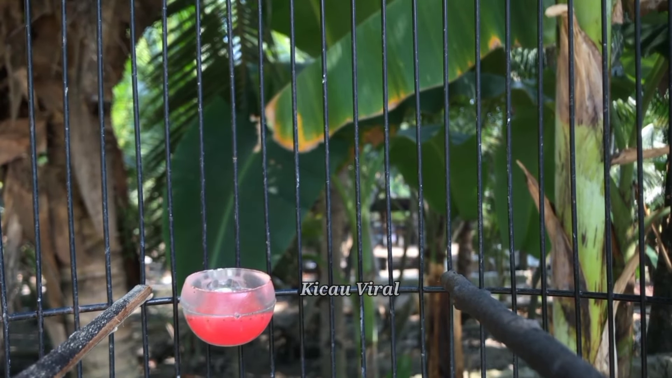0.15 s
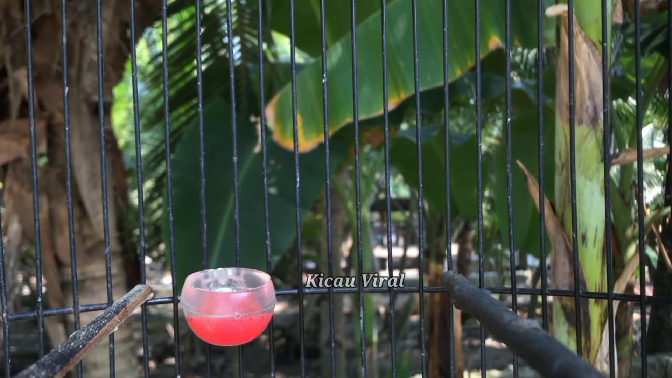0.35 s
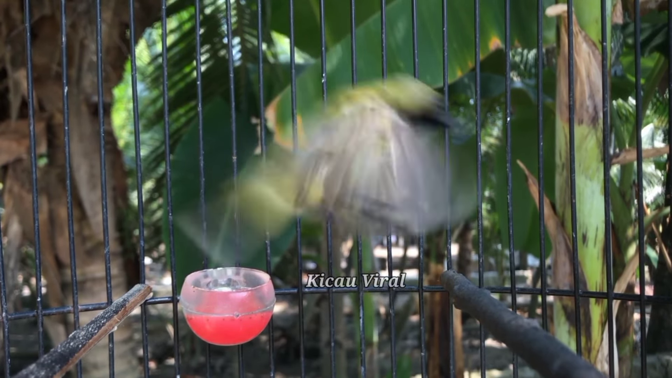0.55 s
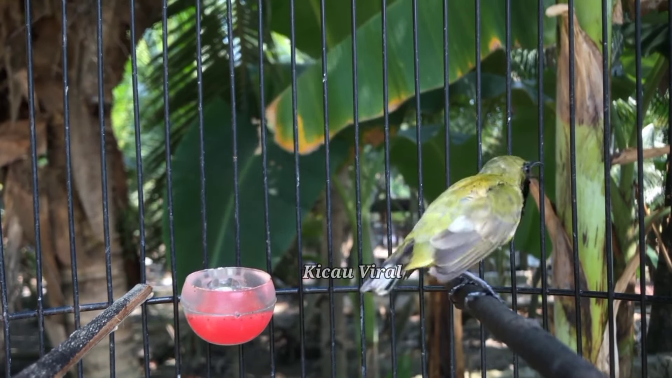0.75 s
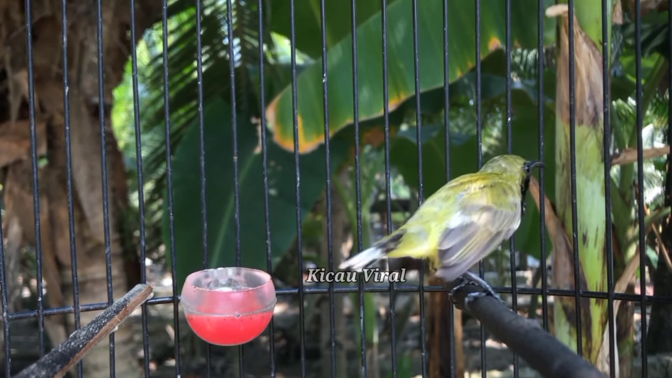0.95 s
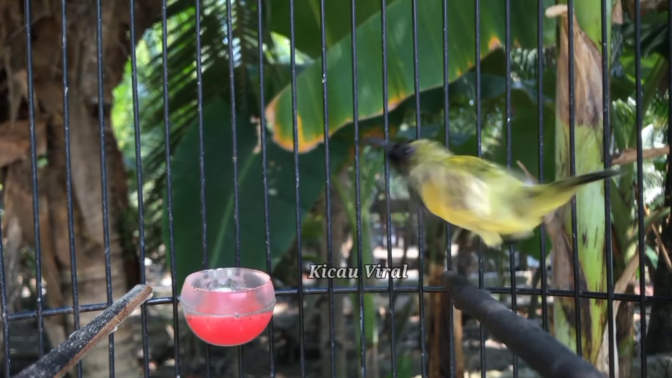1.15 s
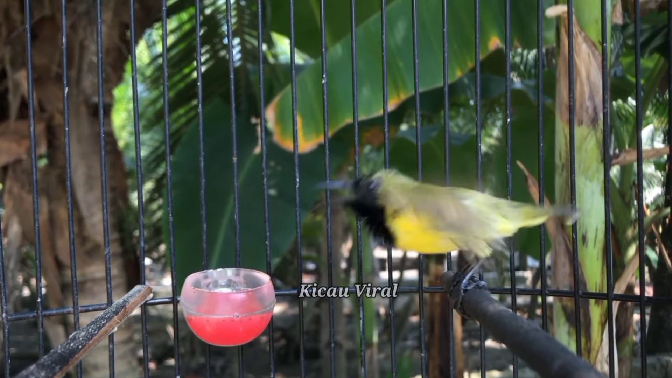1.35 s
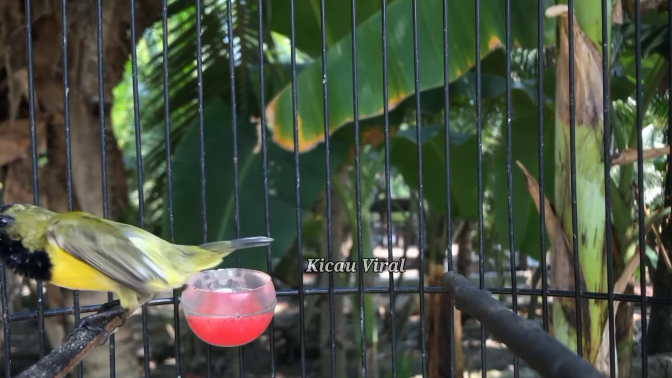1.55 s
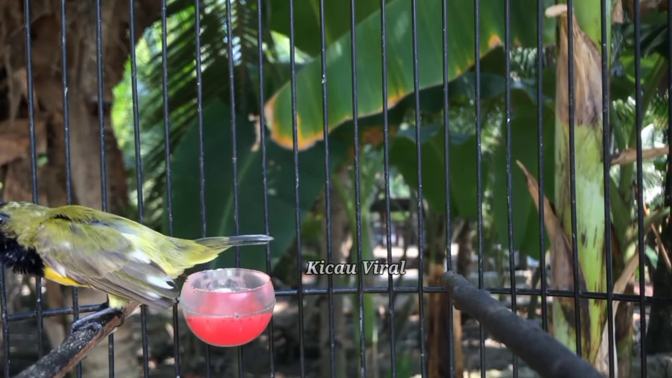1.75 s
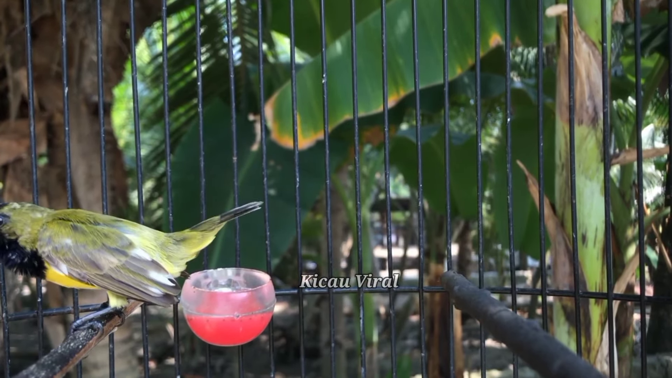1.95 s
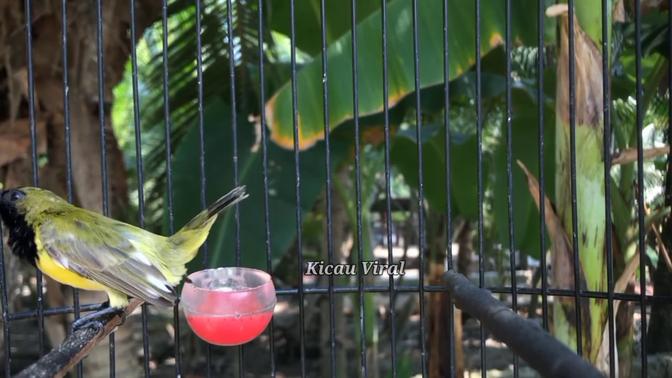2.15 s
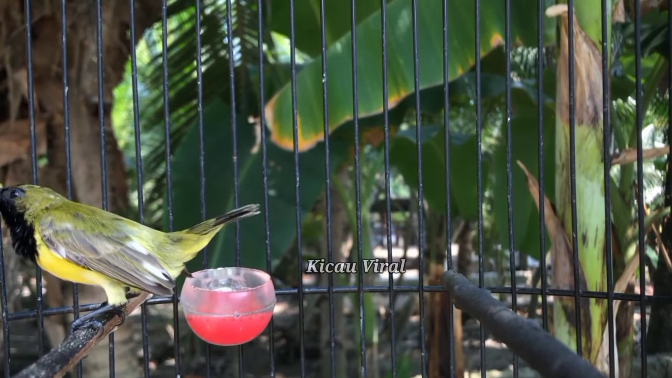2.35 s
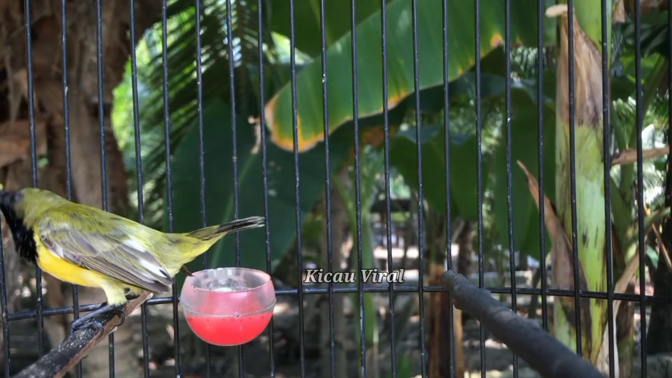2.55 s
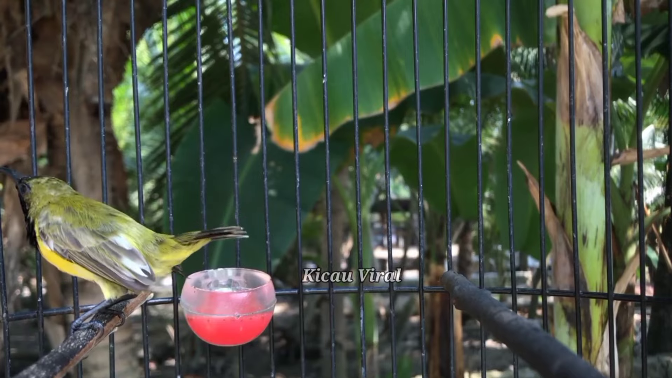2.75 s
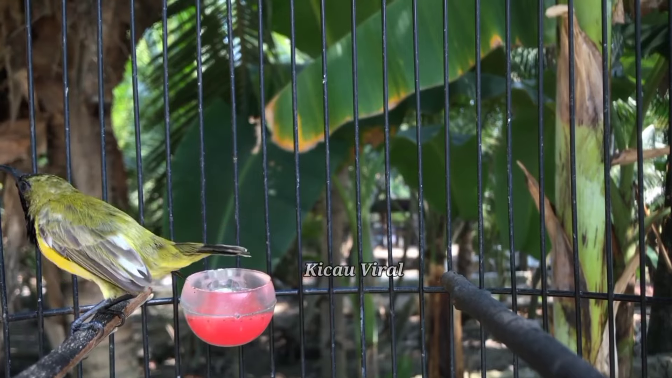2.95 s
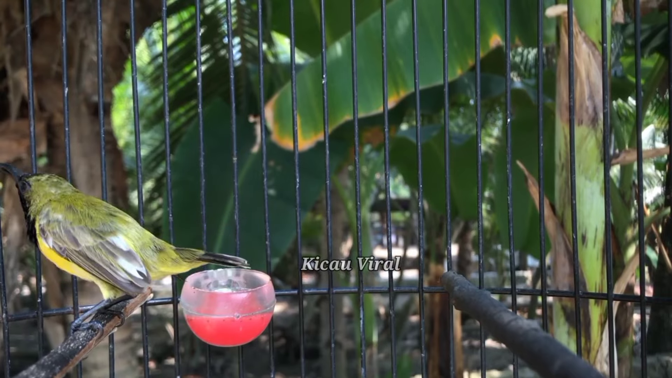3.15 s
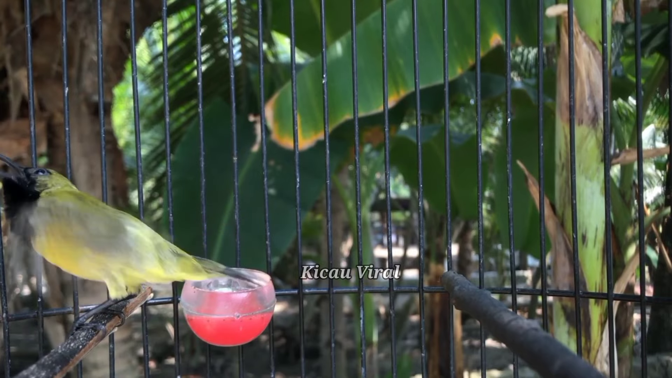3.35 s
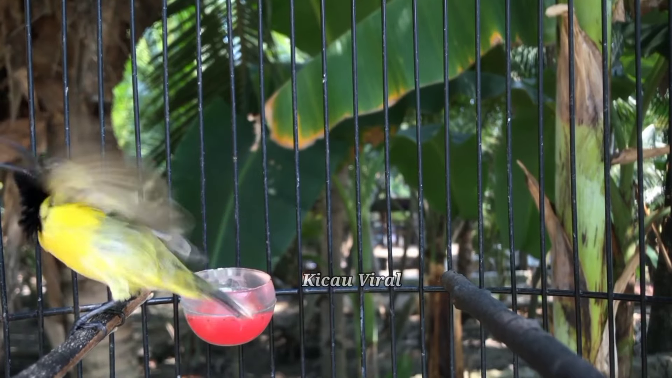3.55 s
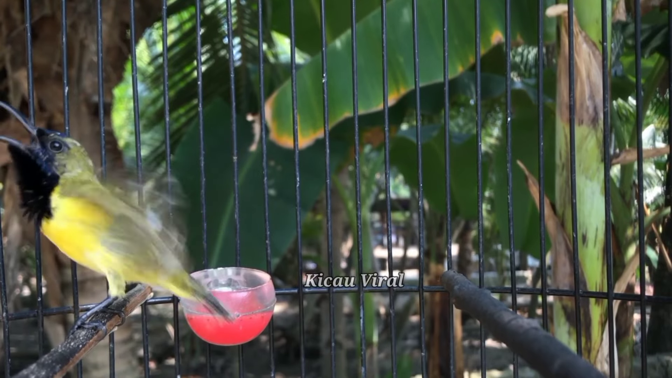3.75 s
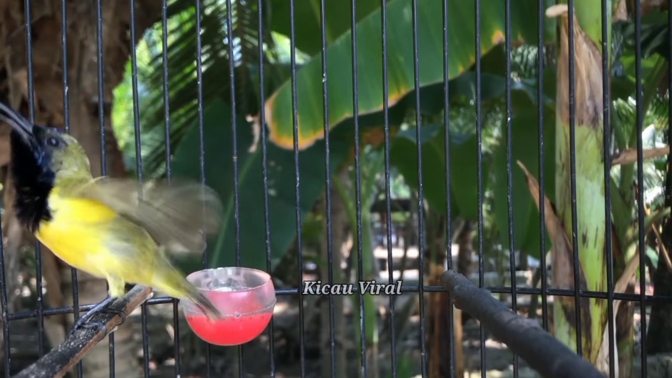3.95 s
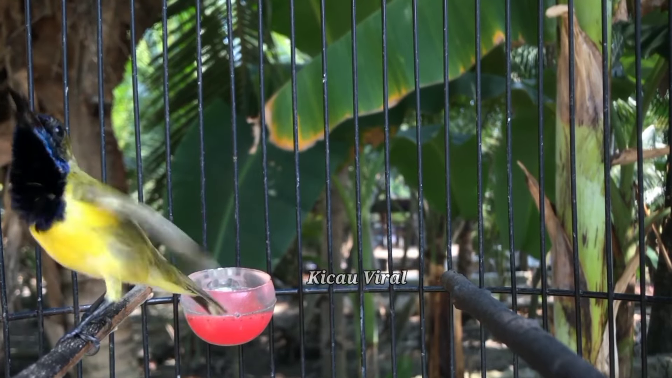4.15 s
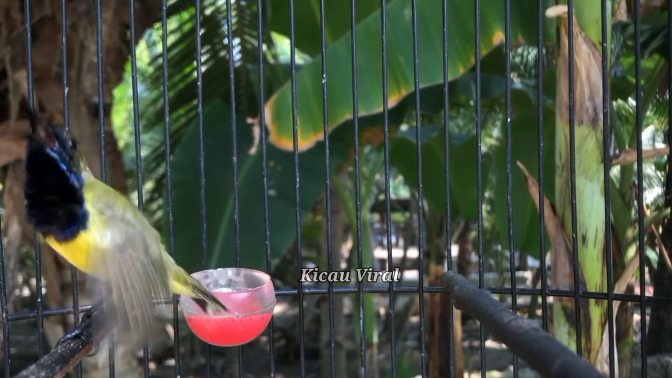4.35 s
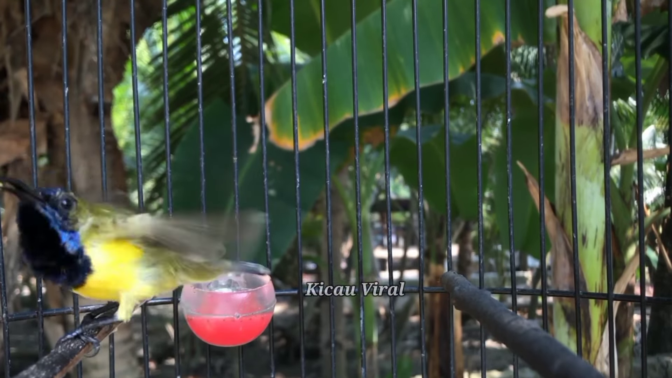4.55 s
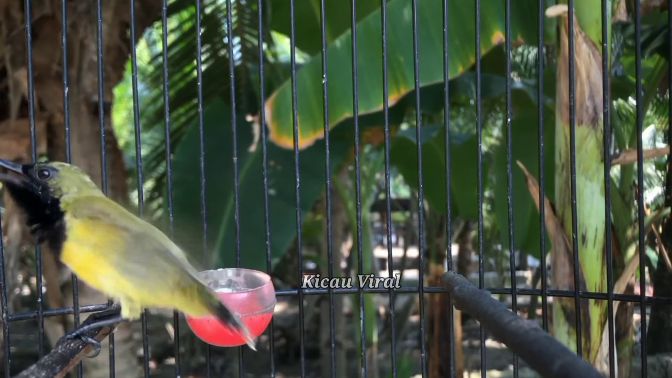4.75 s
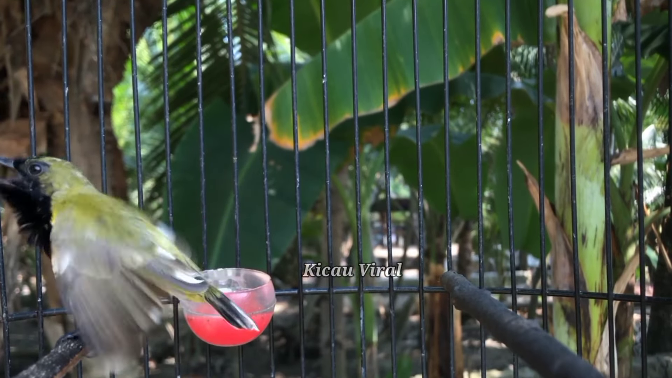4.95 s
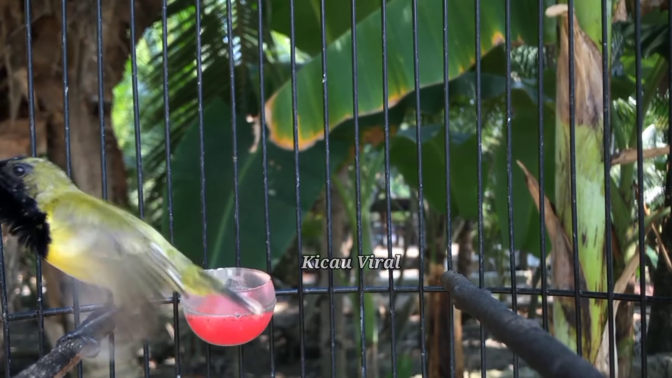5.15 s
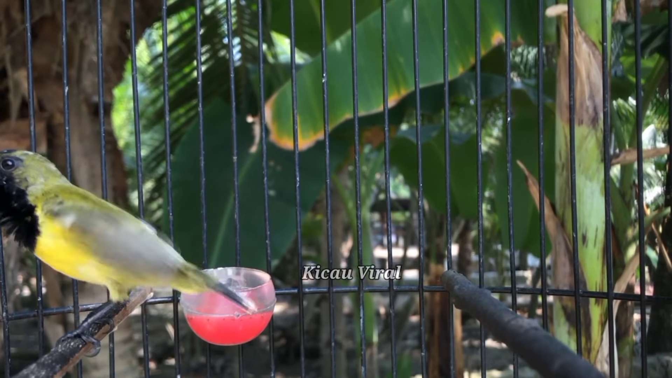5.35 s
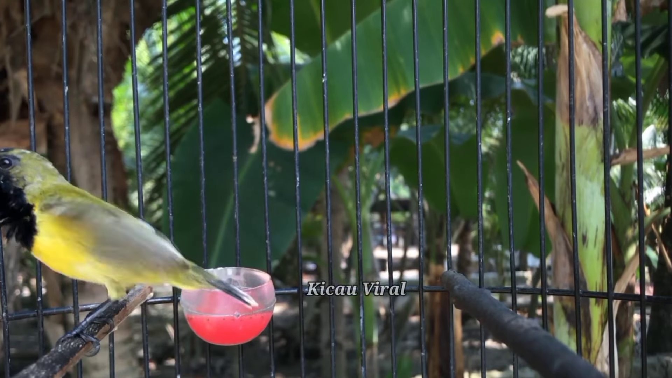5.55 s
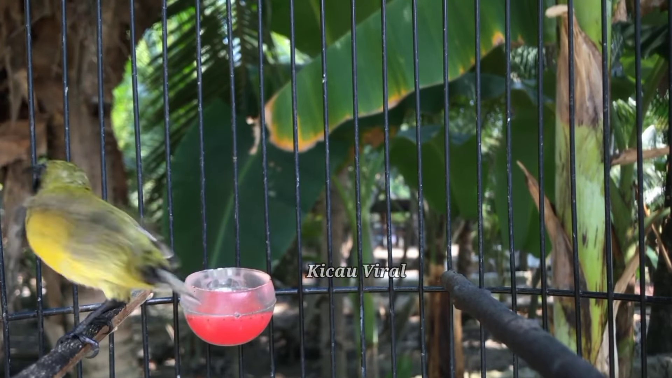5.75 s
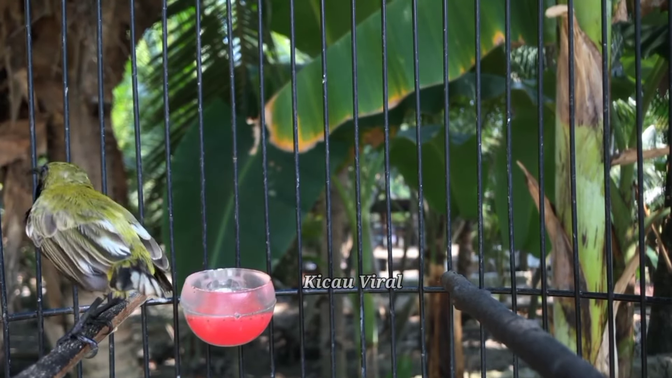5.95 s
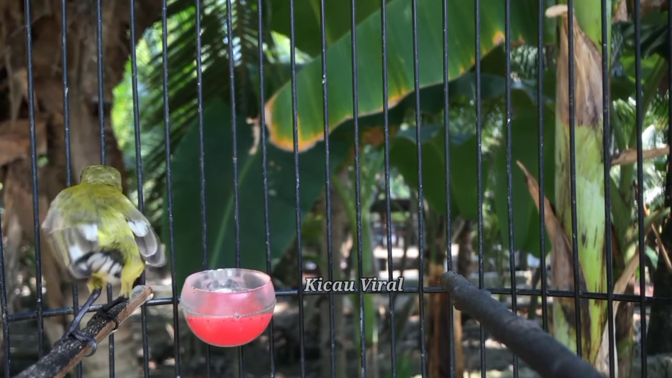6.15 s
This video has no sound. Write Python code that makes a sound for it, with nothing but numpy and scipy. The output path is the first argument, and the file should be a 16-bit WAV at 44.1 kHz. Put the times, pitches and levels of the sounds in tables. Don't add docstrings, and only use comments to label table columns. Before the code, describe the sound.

Outdoors, soft hiss and distant engine rumble lie under scratchy hops, small thuds and ringing cage wire. A close bird gives one piercing chirp, then another, with distant whistles echoing off foliage. After a lull with light rustling and faint taps, it shakes out a high warble, adds two chirps, and launches a rapid string of bright swooping notes, harsh at the loudest crests. The trill stops and far birds whistle at the end.

```python
import sys
import numpy as np
from scipy import signal
from scipy.io import wavfile
from scipy.ndimage import uniform_filter1d

SR = 44100
rng = np.random.default_rng(int(sys.argv[2]) if len(sys.argv) > 2 else 0)


def undo_db(level):
    steps = np.asarray(level, float) / 20
    return 10 ** steps


def bounce(signal):
    frames = np.transpose(np.atleast_2d(signal))
    limited = np.clip(frames, -1, 1)
    pcm = np.round(limited * 32767).astype(np.int16)
    wavfile.write(sys.argv[1], SR, pcm)


N = 273861
LEAD_IN = 4410

# (frequency [Hz], level per Hz [dB])
AIR_SPECTRUM = [(120, -23.5), (200, -1.5), (429, -8), (783, -10), (1170, -10), (2020, -17), (3180, -15.5),
                (4020, -19), (6570, -21), (7890, -24), (10400, -27), (11300, -25), (15500, -17.5)]
# (frequency [Hz], level per Hz [dB])
RUMBLE_SPECTRUM = [(12, -60), (20, -42.5), (45, -8), (64, 4), (81, 0.5), (102, -11), (141, -7.5),
                   (182, -17), (260, -32), (340, -41.5), (570, -120)]
# (time [s], drone level [dB])
ENGINE_LEVELS = [(0.0, -51.5), (1.6, -51.5), (2.5, -59.5), (3.5, -64.5), (4.1, -67.5), (5.2, -67),
                 (5.5, -50), (5.9, -62.5), (6.21, -47)]
# (frequency [Hz], width [Hz], level [dB])
ENGINE_HUMPS = [(303, 100, -0.5), (433, 18, 13), (593, 60, 1.5), (690, 54, -1.5), (1070, 46, -6)]
# (time [s], length [s], rumble
# change [dB], drone change [dB])
LOW_SWELLS = [(0.712, 0.053, 14, 9.5), (4.204, 0.1, 4, 13.5), (4.527, 0.09, -3.5, -30),
              (4.928, 0.048, 8, 1.5), (6.135, 0.067, 9, 1)]

OVERTONES_DB = [3.5, 7.5, 3, -1, -5, 0.5, -2, -10]
THROAT_OPEN_HZ = 6800
# (frequency [Hz], width [Hz], depth [dB])
PERCH_NOTCHES = [(4300, 198, -14), (4900, 210, -2.5), (8020, 780, -1)]
# (pitch [Hz], width [Hz], depth [dB])
VOICE_BREAKS = [(4625, 900, -6), (2720, 250, -7)]
# (time [s], centre pitch [Hz], level [dB], vibrato depth [Hz])
WARBLE = [(3.354, 2063, -28, 299), (3.368, 2733, -14, 297.5), (3.3725, 5730, -18.5, 5),
          (3.377, 3638, -13.5, 0), (3.381, 5800, -4, 905), (3.4, 6800, -3, 621), (3.417, 7300, -3, 448.5),
          (3.425, 7280, -8.5, -3), (3.433, 7220, -53, -1)]

# (time [s], pitch [Hz], effort [dB])
CHIRPS = [
    [(0.854, 3660, -28), (0.863, 3546, -19), (0.8748, 3680, -9), (0.878, 4516, -10), (0.881, 4354, -13),
     (0.8843, 6400, -4.5), (0.887, 6970, -22.5), (0.889, 6110, -10.5), (0.895, 6530, -10)],
    [(1.471, 3573, -23.5), (1.479, 3792, -14), (1.486, 3600, -5), (1.4893, 3740, -5), (1.492, 4530, -13.5),
     (1.4965, 6150, -9), (1.503, 7064, -7), (1.508, 6707, -8), (1.512, 6630, -9.5)],
    [(3.508, 1656, -31.5), (3.52, 2326, -16), (3.53, 3002, -8), (3.538, 2880, -10.5), (3.57, 3680, -7),
     (3.574, 4277, -13), (3.579, 6910, -7.5), (3.584, 7200, -3.5), (3.59, 6350, -6)],
    [(3.657, 1582, -28), (3.668, 2270, -14), (3.692, 3180, -5), (3.709, 3400, -9), (3.723, 3565, -6),
     (3.727, 5073, -21.5), (3.732, 6090, -4.5), (3.737, 7280, -6), (3.745, 6650, -5.5)],
]
# (time after its last point [s], pitch [Hz], level against that point [dB])
CHIRP_FALL = [(.004, 5480, 2), (.008, 3997, -9), (0.013, 2900, -2), (0.018, 2080, -17), (.025, 1863, -14.5)]
# (time stretch [ratio], last pitch [Hz], throat at the end [Hz], level [dB])
FALL_ENDS = [(1.03, 1720, 5200, -5), (.95, 1810, 4700, -7), (.84, 2140, 6500, -4), (.94, 1860, 5300, -4)]
CHIRP_FIRST_DB = [8.9, 2.9, 0.38, 0.156]
FALL_FIRST_DB = [3, 8, 1.5, 1.5]
CATCH_S = [.003, .004, 0.015, .012]

# (time [s], pitch [Hz], level [dB])
LEAD_NOTE = [(3.804, 1673, -31), (3.812, 2110, -17.5), (3.822, 2457, -11.5), (3.829, 2696, -19),
             (3.836, 3110, -3.5), (3.844, 2773, -6.5), (3.852, 2585, -9.5), (3.862, 2542, -13.5),
             (3.87, 2037, -47.5)]
# (crest time [s], crest [Hz], shoulder [Hz], crest level [dB], shoulder level [dB])
TRILL = [(3.9207, 3200, 2654, 0, -5.5), (4.0028, 3194, 2698, -4, -3.5), (4.086, 3080, 2770, -2.5, -7.5),
         (4.1689, 3177, 2722, -0.5, -6.5), (4.2542, 3186, 2546, -2.5, -7.5),
         (4.34, 3230, 2587, -1.6, -11.5), (4.424, 3143, 2573, -5, -8), (4.506, 3288, 2797, -5.5, -7.5),
         (4.5899, 3172, 2410, -6.5, -21), (4.6771, 3076, 2417, -5.5, -19), (4.7666, 3075, 2500, -5, -13.5),
         (4.8529, 3148, 2507, -2.5, -12.5), (4.9386, 3035, 2346, -7.5, -14.5),
         (5.0265, 3230, 2580, -6, -13), (5.113, 3218, 2473, -4.5, -11.5), (5.1982, 3170, 2493, -5.5, -9.5),
         (5.2843, 3212, 2360, -3.5, -13.5), (5.3733, 3015, 2370, -5.5, -17.5),
         (5.4646, 3052, 2320, -4.5, -20.5), (5.567, 2937, 2266, -7, -16), (5.6546, 3174, 2358, -3.5, -14.5),
         (5.745, 3080, 2366, -6, -10), (5.8493, 2947, 2053, -5.5, -14.5)]
# (foot [Hz], rise [Hz], shoulder after the crest [ms], ledge [Hz], ledge end [Hz])
TURNS = [(2130, 2420, 8.5, 2649, 2400), (2150, 2400, 9.5, 2627, 2444), (2090, 2320, 9.5, 2627, 2350),
         (2250, 2480, 12, 2562, 2433), (1990, 2333, 9.5, 2562, 2315), (2010, 2397, 11.5, 2530, 2358),
         (2074, 2405, 10, 2562, 2315), (2103, 2419, 12, 2702, 2519), (2146, 2405, 12, 2476, 2379),
         (2038, 2369, 9.5, 2422, 2293), (2010, 2333, 9.5, 2541, 2326), (1945, 2283, 10.5, 2573, 2358),
         (2074, 2333, 9.5, 2444, 2336), (2110, 2397, 10, 2573, 2390), (2103, 2541, 10, 2552, 2347),
         (1845, 2304, 12, 2476, 2315), (2103, 2326, 10.5, 2422, 2315), (1859, 2268, 8.5, 2358, 2270),
         (1838, 2318, 10.5, 2304, 2200), (1650, 2153, 10, 2272, 2050), (1787, 2326, 10, 2401, 2315),
         (1967, 2340, 10, 2401, 2250), (1773, 2361, 9, 2095, 2085)]
# (start [dB], foot [dB], rise [dB], gap before the crest [dB], ledge [dB])
EFFORTS = [(-21, -15, -16, -18, -14.5), (-19, -15.5, -11, -17, -16.5), (-19.5, -21, -8.5, -16, -12.5),
           (-18.5, -15.5, -11, -15.5, -10), (-26.5, -14, -9.5, -15.5, -11.5),
           (-23.5, -16, -9.5, -15, -12.5), (-26, -13, -8.5, -16.5, -15.5), (-23, -10, -11.0, -14.5, -9),
           (-21.5, -14.5, -11.5, -9, -16), (-21, -18, -11, -14.5, -12.5), (-19.5, -16.5, -9, -13, -13),
           (-29, -15.5, -8.5, -12.0, -13.5), (-24, -11, -12.5, -17.5, -12), (-19.5, -15, -12.5, -17, -13),
           (-25, -18.5, -13, -12.5, -11), (-44, -20, -9.5, -17.5, -9), (-23, -15.5, -10, -15.5, -9),
           (-26.5, -17.5, -9, -17, -13), (-24, -20.5, -10, -18.5, -15.5), (-30, -14.5, -12.5, -14, -16),
           (-18.5, -16.5, -14.5, -19, -6.5), (-14.5, -16.5, -11.5, -19, -15),
           (-28, -16.5, -12, -18.5, -17.5)]
# (knee [Hz], knee level [dB], ledge start [dB], tail [Hz], tail level [dB])
SLIDES = [(2740, -3, -6, 2100, -19), (2860, -6.5, -8, 2347, -13.5), (2820, -9.5, -10.5, 2347, -23),
          (2934, -3, -8.5, 2336, -14), (2980, -2.5, -10.5, 2239, -14.5), (3020, -2, -10, 2325, -14.5),
          (2740, -7, -8, 2250, -14.5), (3036, -4.5, -11.5, 2379, -11.5), (2980, -7.5, -17, 2282, -15.5),
          (2660, -12, -18.5, 2174, -14), (2770, -10, -8, 2239, -12), (2800, -12.5, -11.5, 2271, -12.5),
          (2691, -9.5, -11, 2282, -18.5), (2908, -7, -11.5, 2350, -16), (2831, -7.5, -12, 2293, -17),
          (2982, -8.5, -12.5, 2271, -23), (2870, -6.5, -12.5, 2271, -22.5), (2350, -17, -11, 2131, -26),
          (2573, -6.5, -8.5, 2300, -16.5), (2366, -11.5, -12, 2034, -12.5), (2720, -5, -12.5, 2271, -22),
          (2765, -5.5, -12.5, 2200, -13.5), (2331, -14.5, -21, 2040, -14)]
# (time before the crest [ms], time after it [ms])
SPANS = [(23, 24), (23, 28), (20.84, 30), (23.17, 28), (24, 34), (24, 31), (24, 27), (24.9, 27), (21, 39),
         (24, 25), (24, 25), (23, 28), (24, 32.8), (21.77, 28), (23, 41), (24, 28), (23, 41), (24, 62),
         (23.1, 28), (24, 25), (21, 45), (18.8, 27), (22.7, 20)]
TRILL_FIRST_DB = [-4, 1.5, 1.5, -9.5, -1.5, -1, -0.5, 8, 0.5, -7, 1.5, 3, 10, 1.5, 4, 4, 4, 6, 5, 7, 7.5, 7,
                  6]
# (delay [s], level [dB])
NEAR_ECHOES = [(.0011, -25), (.0023, -21), (.0041, -31.5), (.0072, -22)]

# (time [s], length [s], level [dB])
RUSTLES = [
    (0.257, 0.27, -58),
    (0.494, 0.25, -61.5),
    (2.333, 0.256, -61),
    (3.045, 0.15, -73),
]
# (time [s], peak [dB], thud against it [dB], ring-out t60 [s])
HOPS = [(0.2705, -32, -29, 0.17), (0.2834, -37.5, -23, 0.093), (0.332, -36.5, -29, 0.051),
        (0.661, -25.5, -10, 0.057), (0.6896, -21.5, -8, 0.039), (0.718, -25.5, -12, 0.11),
        (0.7304, -25, -0.5, 0.04), (0.7492, -42, 5.5, 0.062), (1.2717, -39.5, -6, 0.058),
        (1.2908, -31.5, -5, 0.048), (1.3162, -29.5, -5, 0.02), (1.3318, -39.5, -19.5, 0.06),
        (1.6248, -22, -4, 0.058)]
# (frequency [Hz], level [dB], t60 [s])
CAGE_RING = [(480, -2, .3), (600, -1, 0.23), (684.4, 0, 0.27), (1140, -8, 0.17), (1490, -3.5, 0.076)]
# (time [s], peak [dB], frequency [Hz])
KNOCKS = [
    (2.572, -44, 640),
    (2.625, -48, 980),
]

# (time [s], length [s], from [Hz], to [Hz], level [dB])
FAR_GLIDES = [(1.132, 0.045, 3485, 3060, -45), (1.166, 0.028, 3010, 2538, -44),
              (1.269, .05, 3900, 3470, -66), (1.271, .1, 1056, 1044, -59.5),
              (1.428, 0.077, 2900, 2230, -50.5), (0.589, 0.029, 6800, 6580, -59.5),
              (1.204, 0.051, 2580, 3010, -55), (1.308, 0.055, 2943, 2300, -46),
              (1.538, .12, 2520, 2146, -59), (1.646, 0.13, 2323, 1693, -57), (1.755, 0.08, 4300, 4390, -61),
              (1.539, 0.26, 1076, 1149, -59.5), (1.86, .07, 1091, 1147, -68),
              (2.026, .04, 7270, 5640, -53.5), (2.639, 0.12, 1220, 1317, -66.5),
              (2.737, 0.045, 3380, 3390, -57), (2.78, 0.035, 3760, 3920, -59),
              (2.845, 0.027, 5310, 6520, -51.5), (2.805, 0.11, 5110, 6050, -58),
              (2.834, 0.067, 4010, 4400, -63), (3.049, 0.0507, 6440, 5600, -62.5),
              (3.053, 0.0497, 5000, 4280, -71.5), (1.287, 0.096, 3150, 3070, -57),
              (2.912, 0.14, 2270, 3170, -65.5), (2.978, 0.0167, 2790, 2890, -56.5),
              (5.62, 0.27, 3790, 3732, -46), (5.877, 0.07, 2940, 3272, -40.5),
              (6.128, 0.04, 2656, 2942, -41.5), (6.14, .05, 6900, 5920, -61.5),
              (6.085, 0.026, 4000, 4600, -55), (6.15, 0.057, 2660, 2600, -58), (5.481, 0.28, 342, 345, -70),
              (5.958, 0.06, 345.4, 342, -53)]
# (time [s], length [s], from [Hz], to [Hz], level [dB])
FAR_HOOKS = [(1.296, 0.4, 7190, 6250, -60), (1.938, 0.16, 8920, 6536, -61), (2.26, 0.066, 5170, 5914, -59),
             (2.54, 0.1, 8140, 6530, -55.5), (3.129, .13, 8500, 6570, -57.5),
             (6.081, 0.07, 2857, 2725, -44), (5.901, 0.1, 3200, 3550, -41.5),
             (6.158, 0.086, 2964, 3700, -36)]


def evened(x):
    return x / np.sqrt(np.mean(x ** 2) + 1e-20)


def coloured(points, patchy_db, size=1024):
    hz = np.fft.rfftfreq(size, 1 / SR)
    f, db = np.transpose(points)
    a, b, patches = rng.standard_normal((N * 4 // size + 5, len(hz), 3)).T
    patches = uniform_filter1d(patches, size=10, axis=0)
    patches = evened(uniform_filter1d(patches, size=14, axis=1))
    shape_db = np.interp(np.log(hz + 1), np.log(f + 1), db, left=-100, right=-100)
    z = (a + 1j * b) * undo_db(shape_db[:, None] + patchy_db * patches)
    return evened(signal.istft(z, nperseg=size, noverlap=size * 3 // 4)[1][:N])


def band(x, lo_hz, hi_hz):
    return signal.sosfilt(signal.butter(2, [lo_hz, hi_hz], "bandpass", fs=SR, output="sos"), x)


def add(mix, s, sound):
    part = mix[round(s * SR) + LEAD_IN:][:len(sound)]
    part += sound[:len(part)]


def garden(x, t60, fast_t60, fast_db):
    t = np.arange(SR) / SR
    taps = rng.choice([-1., 1.], SR) * (rng.random(SR) < .1) * (t > .004)
    tail = taps * (undo_db(-60 * t / t60) + undo_db(fast_db - 60 * t / fast_t60))
    tail = signal.lfilter([1], [1, -.5], tail)
    return signal.fftconvolve(x, tail / np.linalg.norm(tail))[:len(x)]


def curves(rows, smooth_s):
    s, *columns = np.transpose(rows)
    t = np.arange(s[0], s[-1], 1 / SR)
    size = int(smooth_s * SR)
    return t, [uniform_filter1d(np.interp(t, s, c), size, mode="nearest") for c in columns]


def background():
    t, hz = np.arange(N) / SR, np.geomspace(200, 1600, 200)
    drone_db = np.interp(t, *np.transpose(ENGINE_LEVELS))
    rumble_db = -52.5 + 0.3 * (drone_db - drone_db.mean())
    for s, length, low_db, high_db in LOW_SWELLS:
        puff = np.exp(-((t - s) / length) ** 2)
        rumble_db = rumble_db + low_db * puff
        drone_db = drone_db + high_db * puff
    humps = sum(undo_db(2 * db) / (1 + (2 * (hz - f) / w) ** 2) for f, w, db in ENGINE_HUMPS)
    drone = coloured(np.transpose([hz, 10 * np.log10(humps)]), patchy_db=1.5, size=2048)
    insect = coloured([(11250, -25), (11400, 0), (11550, -25)], patchy_db=0.0)
    hiss = coloured(AIR_SPECTRUM, patchy_db=1.0)
    rumble = coloured(RUMBLE_SPECTRUM, patchy_db=2.5, size=4096)
    return undo_db(-59.5) * hiss + undo_db(drone_db - 5.5) * drone + undo_db(rumble_db) * rumble + undo_db(-77) * insect


def syrinx(hz, db, throat_hz, first_db, breath_db, side_db=-60, ragged=0):
    k = np.arange(1, len(OVERTONES_DB) + 1)[:, None]
    rough = uniform_filter1d(rng.standard_normal((len(k) + 1, len(hz))), size=90, axis=1)
    flutter, *shimmer = uniform_filter1d(rough, size=70, axis=1)
    unsteady = .003 + .0002 * abs(np.gradient(np.log(hz))) * SR + .02 * ragged
    phase = 2 * np.pi * np.cumsum(hz * (1 + unsteady * evened(flutter))) / SR

    octaves = np.log2(k * hz / throat_hz)
    peak = 1 / (1 + (octaves / np.where(octaves < 0, .22, .15)) ** 4)
    upper_peak = undo_db(-44.0) * np.exp(-((k * hz - 14500) / 1500) ** 2)
    high = np.clip((hz - 4500) / 1500, 0, 1)
    source_db = np.array(OVERTONES_DB)[:, None] + first_db * (k == 1) * (1 - high) - 15 * high * (k > 1)
    weight = undo_db(source_db) * np.sqrt(peak + undo_db(-56.5) + upper_peak) * (k * hz < 16000)
    weight /= np.sqrt((weight ** 2).sum(0) / 2)

    shimmer_db = np.clip(-3.2 * np.log10(weight + 1e-9), .5, 4.5) * np.where(k == 1, .55, 1) + 4 * ragged
    weight *= undo_db(np.minimum(evened(np.array(shimmer)) * shimmer_db, 3))
    weight *= undo_db(sum(depth_db * np.exp(-((k * hz - f) / w) ** 2) for f, w, depth_db in PERCH_NOTCHES))

    sidebands = np.cos(phase * 2 / 3) + .4 * np.cos(phase * 4 / 3)
    sidebands *= undo_db(side_db) * np.clip((hz - 5600) / 900, 0, 1) * undo_db(3 * evened(shimmer[0]))
    tone = (weight * np.cos(k * phase)).sum(0) + 2.2 * sidebands

    air = rng.standard_normal((3, len(hz)))
    breath = evened(band(air[0], 4000, 9000))
    breath += undo_db(-6 + 9 * high) * evened(band(air[1], 13000, 17000))
    breath += undo_db(-16) * evened(band(air[2], 1300, 3600))
    puff = undo_db(-43) * np.exp(-np.arange(len(hz)) / SR / .015)
    breath_level = undo_db(db + breath_db + 13 * ragged) + puff
    voice = undo_db(db) * tone + breath_level * breath
    return band(voice * signal.windows.tukey(len(hz), .06), 690, 18400)


def warble(shift_s):
    t, (hz, db, depth) = curves(WARBLE, 0.00096)
    hz = hz + depth * np.cos(2 * np.pi * 111.3 * (t - 3.102))
    off_throat_db = np.minimum(2.2 * ((hz - 6750) / 1050) ** 2, 14)
    db = db - off_throat_db * np.clip((depth - 300) / 150, 0, 1)
    ragged = 1.7 * np.clip((t[0] + 0.024 - t) / 0.015, 0, 1)
    voice = syrinx(hz, db, THROAT_OPEN_HZ, first_db=4.5, breath_db=-35.5, side_db=-48.0, ragged=ragged)
    return t[0] + shift_s, voice


def chirp(rows, first_db, fall_end, fall_first_db, catch_s):
    last_s, _, last_db = rows[-1]
    stretch, end_hz, shut_hz, fall_db = fall_end
    fall_s, fall_hz, _ = CHIRP_FALL[-1]
    fall = [(last_s + stretch * s, f + (end_hz - fall_hz) * s / fall_s, last_db + under_db - 0.5)
            for s, f, under_db in CHIRP_FALL]
    t, (hz, db) = curves([*rows, *fall], 0.0019)
    db = db + sum(depth_db * np.exp(-((hz - f) / w) ** 2) for f, w, depth_db in VOICE_BREAKS)
    falling = np.clip((t - last_s) / (fall[-1][0] - last_s), 0, 1)
    db = db + fall_db * falling ** 2
    throat_hz = THROAT_OPEN_HZ + (shut_hz - THROAT_OPEN_HZ) * np.clip((falling - .35) / .4, 0, 1)
    first_db = first_db + fall_first_db * np.minimum(3 * falling, 1)
    ragged = np.minimum(3.0 * falling, 1.1) + .9 * np.clip(1.5 - (t - t[0]) / catch_s, 0, 1)
    return t[0], syrinx(hz, db, throat_hz, first_db, breath_db=-31.5, side_db=-26.5, ragged=ragged)


def trill_rows(note, turns, efforts, slide, span):
    crest, top, shoulder, loud, dip = note
    foot_hz, rise_hz, turn, ledge_hz, edge_hz = turns
    *climb_db, gap_db, shelf_db = efforts
    knee_hz, knee_db, ledge_db, tail_hz, tail_db = slide
    late = crest - TRILL[0][0]
    end_hz, end_db = 1946 + 52 * late, -20 + 8 * late
    shoulder_hz = min(shoulder, .975 * ledge_hz + 90 * max(turn - 11, 0) ** 3)
    ms = np.arange(-28, 33)
    pitch_ms = [-28, -16, -9, -2.5, 0, .3 * turn, 6, turn, 14, 18, 21, 29]
    pitch_hz = [.66 * foot_hz, foot_hz, rise_hz, .955 * top, top, .96 * top,
                knee_hz, shoulder_hz, ledge_hz, edge_hz, tail_hz, min(end_hz, .89 * tail_hz)]
    hz = np.interp(ms, pitch_ms, pitch_hz)
    level_ms = [-28, -21, -16, -11, -5.5, -2, .3 * turn, 5.5, turn, 14, 17, 21, 25, 27.5, 30]
    level_db = [climb_db[0] - 25, *climb_db, gap_db, loud, loud, knee_db, dip,
                ledge_db, shelf_db, tail_db, end_db - 3.5, end_db - 7, end_db - 25]
    outside_ms = np.maximum(np.maximum(-span[0] - ms, ms - span[1]), 0)
    db = np.interp(ms, level_ms, level_db) - 2 * outside_ms
    return np.transpose([crest + ms / 1000, hz, db])


def trill_note(rows, first_db=-4.5):
    t, (hz, db) = curves(rows, .0018)
    after = t - t[np.argmax(hz)]
    closing = np.clip((after + 0.0081) / 0.014, 0, 1)
    trailing = np.maximum(hz, np.interp(t - 0.0022, t, hz))
    open_hz = np.clip(2.95 * hz, 5800, 1.033 * THROAT_OPEN_HZ)
    throat_hz = (1 - closing) * open_hz + closing * 2.044 * trailing
    crest_db = first_db * np.exp(-((after - .004) / 0.0018) ** 2)
    climb_db = -12 * np.exp(-((after + 0.0014) / 0.0036) ** 2)
    ragged = 1.8 * np.clip((t[0] + 0.01716 - t) / 0.011, 0, 1) + .15
    return t[0], syrinx(hz, db, throat_hz, -4 + crest_db + climb_db, breath_db=-32.0, ragged=ragged)


def songbird():
    dry = np.zeros(N + LEAD_IN)
    notes = [warble(-3.432), warble(0), trill_note(LEAD_NOTE)]
    for settings in zip(CHIRPS, CHIRP_FIRST_DB, FALL_ENDS, FALL_FIRST_DB, CATCH_S):
        notes.append(chirp(*settings))
    for *row, first_db in zip(TRILL, TURNS, EFFORTS, SLIDES, SPANS, TRILL_FIRST_DB):
        notes.append(trill_note(trill_rows(*row), first_db))
    for note in notes:
        add(dry, *note)
    near = dry + sum(undo_db(db) * np.roll(dry, round(s * SR)) for s, db in NEAR_ECHOES)
    return near + undo_db(-20) * garden(dry, t60=0.41, fast_t60=0.056, fast_db=24.5)


def rustles():
    dry = np.zeros(N + LEAD_IN)
    for s, length, db in RUSTLES:
        u = np.linspace(0, 1, int(length * SR))
        hiss = evened(band(rng.standard_normal(len(u)), 2400, 10000))
        add(dry, s, undo_db(db) * hiss * 2 * u ** 0.4 * (1 - u))
    return dry


def hops():
    dry, t = np.zeros(N + LEAD_IN), np.arange(12000) / SR
    ring = sum(undo_db(db - 60 * t / t60) * np.sin(2 * np.pi * hz * t) for hz, db, t60 in CAGE_RING)
    for s, db, thud_db, t60 in HOPS:
        hiss, low = rng.standard_normal((2, len(t)))
        fade = undo_db(-60 * t / t60) + 0.56 * undo_db(-60 * t / 0.0043)
        scratch = evened(band(hiss, 2400, 15000)) * fade
        thud = evened(band(low, 360, 1497)) * undo_db(-60 * t / 0.081) + undo_db(-5.0) * ring
        add(dry, s, undo_db(db - 16.5) * (scratch + undo_db(thud_db) * thud))
    for s, db, hz in KNOCKS:
        add(dry, s, undo_db(db) * np.sin(2 * np.pi * hz * t) * undo_db(-60 * t / 0.015))
    return dry + undo_db(-11.0) * garden(dry, t60=0.66, fast_t60=.1, fast_db=-4.5)


def far_birds():
    dry = np.zeros(N + LEAD_IN)
    for table, bend in [(FAR_GLIDES, 1.4), (FAR_HOOKS, 7.6)]:
        for s, length, from_hz, to_hz, db in table:
            u = np.linspace(0, 1, int(length * SR))
            wobble, flutter = uniform_filter1d(rng.standard_normal((2, len(u))), size=200, axis=1)
            hz = to_hz + (from_hz - to_hz) * (1 - u) ** bend + 22.15 * evened(wobble)
            whistle = np.sin(2 * np.pi * np.cumsum(hz) / SR) * signal.windows.tukey(len(u), .4)
            add(dry, s, undo_db(db + 1.5 * evened(flutter)) * whistle)
    return .65 * dry + garden(dry, t60=0.78, fast_t60=0.2, fast_db=7.5)


def scene():
    events = songbird() + rustles() + hops() + far_birds()
    return (background() + events[LEAD_IN:])[None]


def low_pass(x):
    return signal.sosfilt(signal.butter(12, 15610, fs=SR, output="sos"), x)


def record(dry):
    clipped = np.clip(dry, -.99, .99)
    return low_pass(clipped)


dry = scene()
out = record(dry)
bounce(out)
```